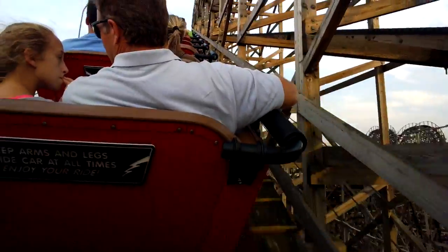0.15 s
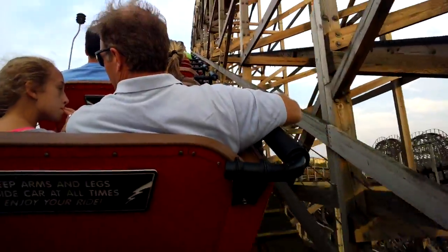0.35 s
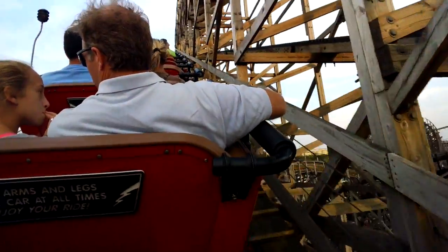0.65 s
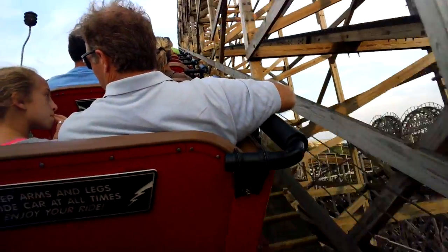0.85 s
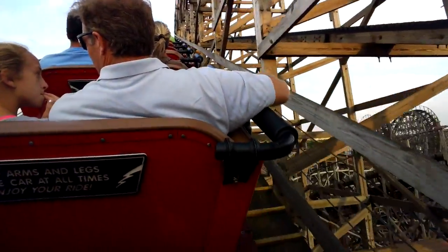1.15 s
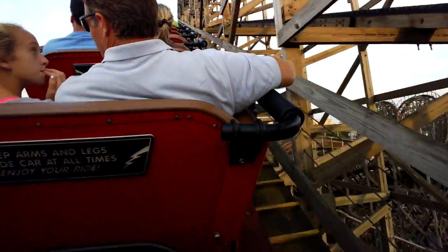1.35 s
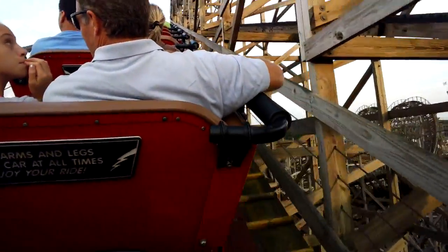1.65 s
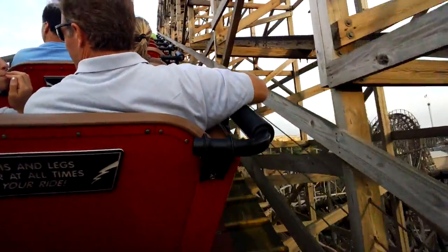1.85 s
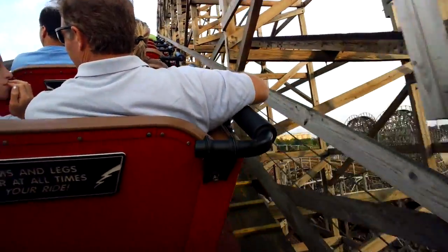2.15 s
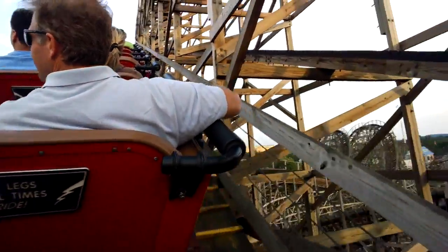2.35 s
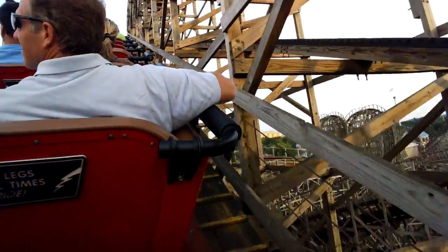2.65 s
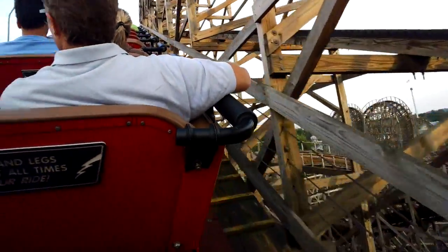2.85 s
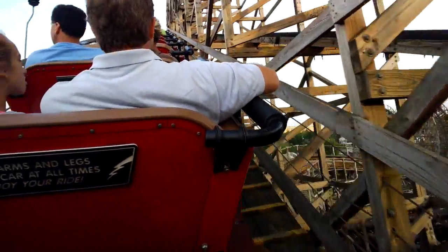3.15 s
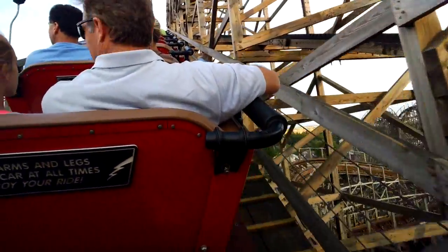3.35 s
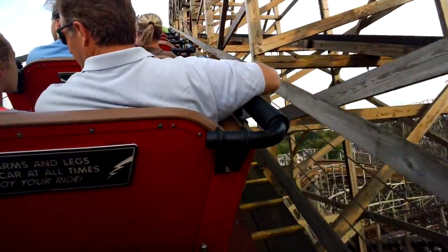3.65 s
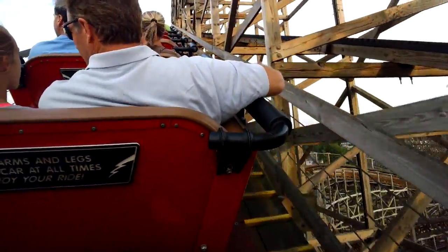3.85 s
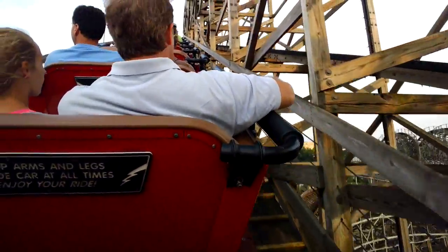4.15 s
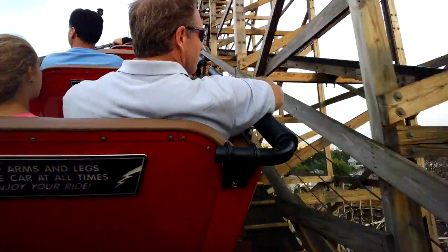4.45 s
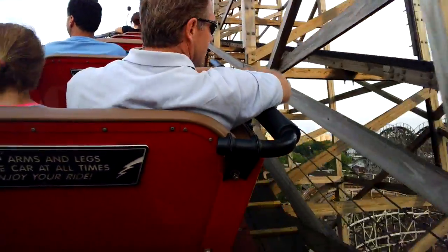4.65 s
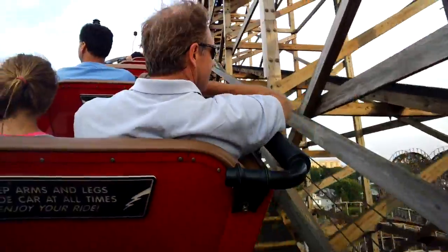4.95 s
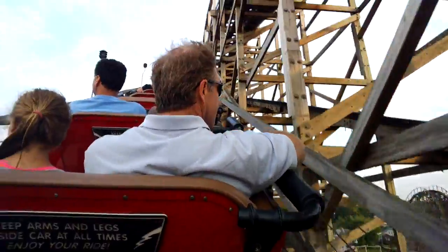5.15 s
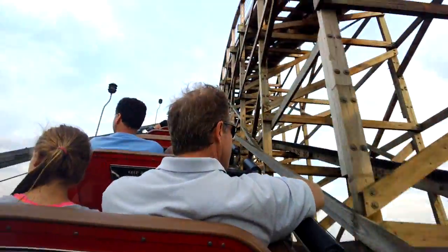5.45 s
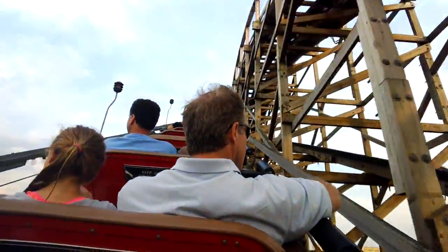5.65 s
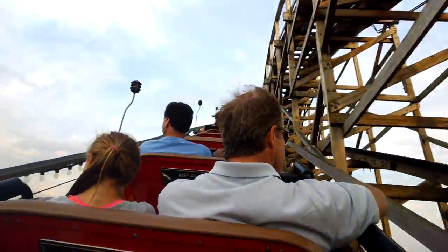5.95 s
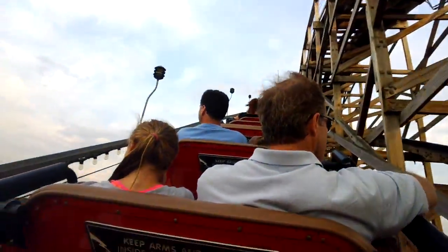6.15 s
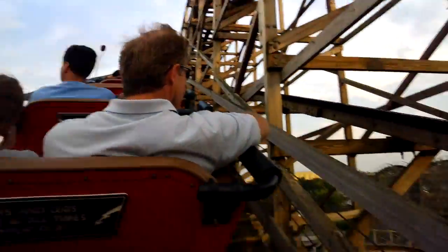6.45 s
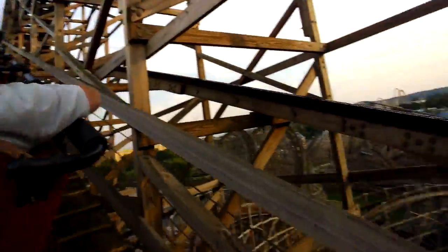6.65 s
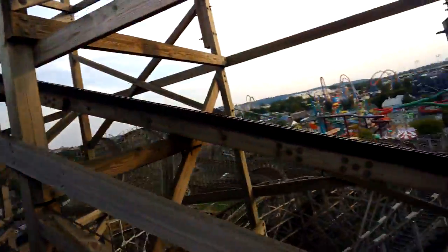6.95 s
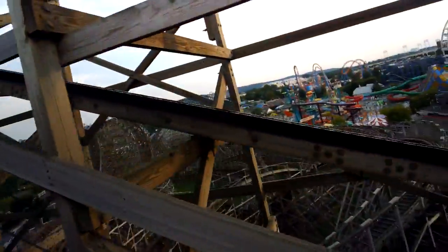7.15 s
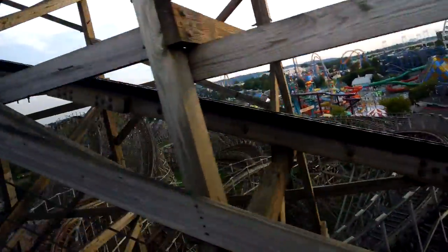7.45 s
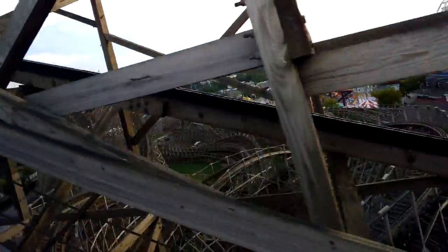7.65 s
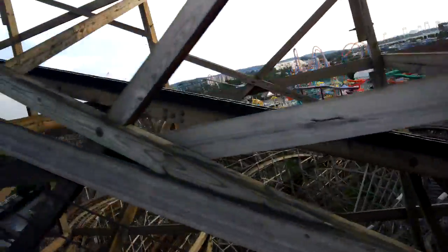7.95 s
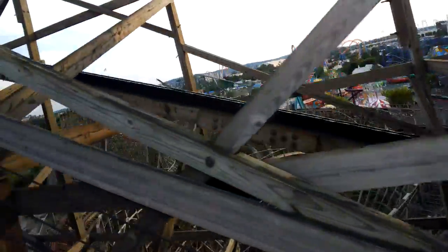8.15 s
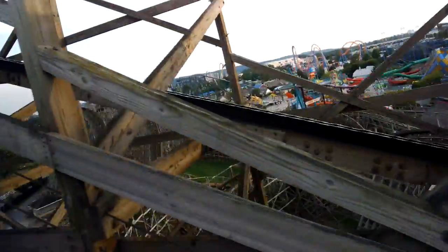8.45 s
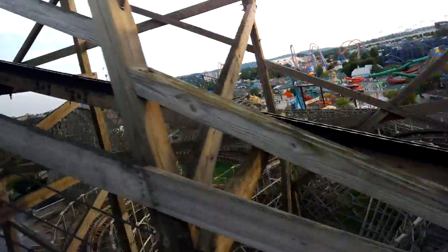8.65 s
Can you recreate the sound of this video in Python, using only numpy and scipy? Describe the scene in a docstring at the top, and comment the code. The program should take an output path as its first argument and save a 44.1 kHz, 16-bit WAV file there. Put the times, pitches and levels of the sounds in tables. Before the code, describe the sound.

A continuous fast metal ratchet rattles right under the microphone: dull clacks of the car body, sharp steel ticks and short high rings, about ten or more strikes a second in a loose mechanical rhythm. Occasional low timber thuds. Past the middle, wind begins softly, then buffets in low lumpy bursts and pops that briefly choke the rattle, which continues thinner to the end. Dry, narrow open-air sound from a handheld camera.

```python
"""Anti-rollback dogs of a wooden coaster train clack over the rack of its lift hill, heard from a camera in a car.
Each landing is a burst of noise through body colours and decaying modes: dull clacks, bright pings of steel.
Noise bursts ring the wheels and a plate; the chain is a random patter of small blows through the same steel.
Dull knocks of the timber are filtered noise, over a faint low noise with random level steps. Later, puffs of wind
thud on the microphone: swelling low noise, with decaying sines as pops. The picture is nearly mono."""
import sys
import numpy as np
from scipy import signal
from scipy.fft import rfft, irfft, next_fast_len
from scipy.io import wavfile
from scipy.ndimage import uniform_filter1d

SR = 44100
rng = np.random.default_rng(int(sys.argv[2]) if len(sys.argv) > 2 else 0)


def bounce(signal):
    """Save signal as a 16-bit WAV file at the path given by the first command-line argument."""
    frames = np.transpose(np.atleast_2d(signal))
    limited = np.clip(frames, -1, 1)
    pcm = np.round(limited * 32767).astype(np.int16)
    wavfile.write(sys.argv[1], SR, pcm)


N = 387638

# All levels are relative, ahead of the gains in the functions. Mode pitches are nominal; blows may detune them.
# blows on the nearest steel dog: hit_s [s], blow_db [dB], share of its high pair pair_db [dB]
NEAR_DOG_BLOWS = [(0.05, -25, -3), (0.1072, -21, -19), (0.208, -10, -7.5), (0.31, -9.5, -11),
                  (0.4104, -15.5, -17), (0.469, -15, -13), (0.5447, -21, -9), (0.5796, -20, -10),
                  (0.6826, -27, -14), (0.72, -16.5, -13), (0.7826, -19, -16), (0.884, -13, -27),
                  (0.9936, -25.5, 1), (1.045, -19, -9), (1.1238, -24, -8), (1.186, -20, -7),
                  (1.2755, -14, -11), (1.301, -15.5, -13), (1.42, -15, -15), (1.482, -30, -12),
                  (1.509, -11.5, -10), (1.613, -21, -4), (1.6821, -25, -23), (1.711, -17, -18),
                  (1.8731, -21, -27), (2.031, -13.5, -15), (2.0762, -30, -8), (2.136, -11, -14),
                  (2.234, -15, -19), (2.335, -13, -10), (2.4227, -17.5, -10), (2.451, -16.5, -12),
                  (2.552, -12, -19), (2.646, -14, -30), (2.6875, -19, -21), (2.7626, -18, -12.5),
                  (2.838, -18, -28), (2.8664, -20, -24), (2.928, -16, -10), (3.079, -19, -10),
                  (3.178, -15, -12.5), (3.2814, -17.5, -17), (3.324, -14, -13), (3.388, -22, -6),
                  (3.439, -17.5, -12), (3.4989, -32, -16), (3.5797, -15, -17), (3.6466, -23, -10),
                  (3.7007, -14, -14), (3.9, -12.5, -16), (3.989, -20, -7), (4.073, -19, -13),
                  (4.168, -14, -15), (4.2627, -26, -3), (4.3306, -24, -7.5), (4.3815, -21, -5),
                  (4.428, -14.5, -12), (4.5225, -11.5, -20), (4.6074, -22, -21), (4.6276, -13, -11),
                  (4.7284, -13, -18), (4.8564, -23, -7.5), (4.945, -24.5, -1), (5.0025, -22, -15),
                  (5.038, -12, -17), (5.2076, -15.5, -14), (5.309, -16.5, -8.5), (5.388, -28, -4),
                  (5.4115, -17, -14), (5.6306, -20, -9), (5.7194, -17, -12), (5.778, -20, -12),
                  (5.8227, -18, -15), (5.863, -15, -19), (5.993, -18, -14), (6.082, -16, -9),
                  (6.191, -17, -3), (6.295, -22, -1.5), (6.353, -23, -24), (6.445, -21, -15),
                  (6.599, -17, -23), (6.644, -19, -15), (6.7548, -32, -12), (6.988, -25.5, -11),
                  (7.059, -27, -15), (7.076, -21, -11), (7.3637, -27, -5), (7.4, -16.5, -21),
                  (7.565, -20, -17), (7.6321, -25, -11), (7.7537, -20, -9), (7.8575, -21.5, -11),
                  (7.955, -19, -19), (8.168, -18.5, -14), (8.267, -21, -18), (8.3727, -13.5, -12),
                  (8.442, -19.5, -28), (8.572, -26, -16), (8.689, -19, -16)]
# the car body as a broad colour: freq_hz [Hz], density_db [dB per Hz]
CAR_COLOUR = [(59, -63), (100, -59), (562, -4), (622, -1), (827, -2), (1980, 6), (2460, 3.5), (2670, -0.5),
              (3740, -4.5), (4140, -6), (5500, -5.5), (7150, -6.5), (12100, -120)]
# low modes of rack and wheels: pitch_hz [Hz], level_db [dB], t60_s [s]
RACK_LOW_MODES = [(1377, -0.5, 0.04), (1520, 1.5, 0.092), (1628, -4.5, 0.069), (1829, -7, 0.17),
                  (1970, -6.5, 0.11), (1947, 0, 0.087), (2198, 5.5, 0.014), (2480, -3, 0.027)]
# high modes of rack and wheels: pitch_hz [Hz], level_db [dB], t60_s [s]
RACK_HIGH_MODES = [(3200, 0, 0.0015), (4020, -15, 0.03), (4027, 3, 0.073), (4110, 1, 0.072),
                   (4250, 5.5, .03), (4348, 0.5, 0.031)]
# the dog's low modes: pitch_hz [Hz], level_db [dB], t60_s [s]
DOG_LOW_MODES = [(6213, 5, 0.021), (6380, -3.5, 0.034), (6530, -1, 0.014)]
# the dog's strong high pair: pitch_hz [Hz], level_db [dB], t60_s [s]
DOG_HIGH_PAIR = [(7945, 3, 0.04), (7915, -2, 0.03)]
# the dog's overtones: pitch_hz [Hz], level_db [dB], t60_s [s]
DOG_OVERTONES = [(10560, -3, .023), (11050, -1, .025), (12345, 0, .014), (13555, -1, .017)]
# broad treble of steel on steel: freq_hz [Hz], density_db [dB per Hz]
STEEL_COLOUR = [(2500, -11.5), (4500, -0.5), (5500, -8.5), (7200, -1.5), (8700, 3.5), (9600, -2),
                (11600, -2.5), (14500, -1)]
# hard gusts pressing on the port: dip_s [s], deep bass bass_db [dB], dip of the rattle dip_db [dB], half_s [s]
HARD_GUSTS = [(6.583, -50, 15, 0.019), (6.734, -44, 12.5, 0.019), (6.855, -42, 8.5, 0.04),
              (6.94, -55, 6, 0.041), (7.724, -58, 7.5, 0.02), (7.989, -49, 8, 0.013),
              (8.067, -50, 22, 0.033), (8.157, -59, 9, 0.034), (8.62, -65, 11.5, 0.023),
              (8.671, -56, 13.5, 0.019)]


def undb(db):
    """Amplitude factor of a level in dB."""
    return 10 ** (np.asarray(db) / 20)


def unit(x):
    """Scale to an RMS of 1."""
    return x / np.sqrt(np.mean(x ** 2))


def decay(t, t60):
    """Exponential amplitude decay that has fallen by 60 dB at t60."""
    return np.exp(-np.log(1000) * t / t60)


def colour(x, points):
    """Filter by a spectrum of (Hz, dB) points, joined by straight lines over log frequency."""
    hz, db = np.transpose(points)
    size = next_fast_len(N)
    f = np.arange(size // 2 + 1) * SR / size + 1  # 1 Hz up, to keep the log finite
    gain = undb(np.interp(np.log(f), np.log(hz), db))
    return irfft(rfft(x, size) * gain, size)[:N]


def ring(x, modes, times=(), vary_db=0., detune=0.):
    """Sum of decaying resonances driven by x; each blow lands on another part, so it weighs and tunes them anew."""
    blow = np.searchsorted(times, np.arange(len(x)) / SR)
    chance = rng.standard_normal((len(times) + 1, 2, len(modes)))
    weights = undb(vary_db * np.clip(chance[:, 0], -3, 1.3))
    weights = 1.25 * weights / np.sqrt(np.mean(weights ** 2, axis=1, keepdims=True))
    tuning = 1 + detune * chance[:, 1]
    out, push = 0, signal.lfilter([1, 0, -1], [1], x)
    for k, (hz, db, t60) in enumerate(modes):
        r, w = decay(1 / SR, t60), 2 * np.pi * hz / SR
        turn = np.exp(1j * np.cumsum(w * tuning[blow, k]))
        # shift the mode down to 0 Hz, let it decay there, shift it back
        swing = signal.lfilter([1], [1, -r], push * weights[blow, k] / turn)
        out = out + undb(db) * np.sqrt(1 - r) / np.sin(w) * (turn * swing).imag
    return out


def bursts(times, db, rise_s, t60):
    """Envelope of blows that swell softly from rise_s ahead of each time and die away; powers add."""
    power = np.zeros(N)
    for s, gain, up, down in np.broadcast(times, undb(db), rise_s, t60):
        i = max(int((s - up) * SR), 0)
        up, down = max(up, 1e-4), max(down, 5e-3)
        t = np.arange(min(int(down * SR), N - i)) / SR
        swell = 1 - np.exp(-(t / up) ** 2)
        power[i:i + len(t)] += (gain * swell * decay(t, down)) ** 2
    return np.sqrt(power)


def chatter(hold_s, spread_db):
    """Noise whose size jumps every hold_s: many tiny bounces of uneven force, none far above the rest."""
    k = max(int(hold_s * SR), 1)
    force = np.minimum(rng.standard_normal(N // k + 1), 1)
    size = np.repeat(undb(spread_db * force), k)[:N]
    return unit(rng.standard_normal(N) * size)


def voice(envelope, drive, modes, times, vary_db=8.5, detune=0.0047):
    """Ring the modes under an envelope, scaled by how loudly the steady drive would ring them."""
    steady = ring(drive[:2 * SR], modes)
    return ring(envelope * drive, modes, times, vary_db, detune) / np.sqrt(np.mean(steady ** 2))


def car_and_rack():
    """All the rattle of the car together; the rattle loses its deep bass, only the knocks keep theirs."""
    rattle = lulls() * (clacks() + pings() + chain()) + rings()
    # a narrow dip near 2.7 kHz, perhaps from the microphone casing
    dip_hz, dip_width_hz, dip_share = 2667, 126, 0.61
    narrow_band = signal.lfilter(*signal.iirpeak(dip_hz, dip_hz / dip_width_hz, fs=SR), rattle)
    rattle = rattle - dip_share * narrow_band + plate()
    no_bass = signal.butter(4, 230., "high", fs=SR, output="sos")
    return signal.sosfilt(no_bass, rattle) + knocks()


def clacks():
    """Each landing is a short bouncing contact that shakes car and rack and scrapes out treble, in its own mix."""
    # dogs landing on the rack: hit_s [s], blow_db [dB], t60_s of the blow, shortened for some layers [s]
    landings = [(0.045, -19, 0.51), (0.1121, -24, 0.19), (0.2005, -15.5, 0.5), (0.3127, -10, 0.1),
                (0.341, -11.5, 0.093), (0.415, -31, 0.096), (0.4476, -14, 0.26), (0.492, -16, 0.52),
                (0.553, -13.5, 0.26), (0.584, -13, 0.65), (0.6594, -6, 0.064), (0.6905, -9.5, 0.099),
                (0.7215, -4, 0.062), (0.7916, -18, 0.082), (0.8754, -19, 0.98), (0.9414, -18, 0.14),
                (0.965, -13.5, 0.21), (0.9904, -15, 0.1), (1.037, -11, 0.14), (1.0764, -11, 0.076),
                (1.1215, -16, 0.15), (1.1448, -21.5, 0.25), (1.173, -12, 0.18), (1.192, -14, 0.06),
                (1.2285, -3, 0.051), (1.275, -3.5, 0.1), (1.3344, -18, 0.18), (1.377, -13, 0.14),
                (1.48, -15.5, 0.38), (1.537, 3, 0.042), (1.5788, -14, 0.062), (1.639, -6, 0.099),
                (1.6825, -17, 0.38), (1.7415, -14.5, 0.15), (1.786, -15.5, 0.3), (1.835, -8.5, 0.091),
                (1.8684, -14, 0.13), (1.899, -12, 0.088), (1.9856, -17, 0.14), (2.0144, -13, 0.1),
                (2.078, -16.5, 0.13), (2.137, -20, 0.16), (2.1794, -27, 0.12), (2.2318, -22, 0.077),
                (2.274, -22, 0.38), (2.318, -12, 0.17), (2.344, -13, 0.13), (2.368, -11, 0.13),
                (2.4194, -13, 0.1), (2.4468, -14, 0.11), (2.4735, -13, 0.16), (2.54, -23, 0.095),
                (2.5545, -13, 0.075), (2.5882, -6.5, 0.062), (2.632, -21, 0.13), (2.6509, -9, 0.1),
                (2.6818, -13.5, 0.097), (2.7616, -12, 0.056), (2.7916, -13, 0.11), (2.812, -8, 0.078),
                (2.837, -11.5, 0.1), (2.8674, -16, 0.14), (2.9013, -16.5, 0.18), (2.9292, -18, 0.29),
                (2.966, -11, 0.09), (2.9941, -17, 0.1), (3.012, -16, 0.14), (3.07, -14.5, 0.28),
                (3.114, -9, 0.08), (3.1354, -13, 0.083), (3.171, -21.5, 0.12), (3.319, -13.5, 0.19),
                (3.394, -16.5, 0.37), (3.4605, -10, 0.059), (3.492, -18, 0.13), (3.521, -19.5, 0.22),
                (3.578, -22, 0.56), (3.6471, -18, 0.05), (3.723, -15, 0.11), (3.786, -19.5, 0.71),
                (3.893, -20, 0.25), (3.942, -12.5, 0.093), (3.9874, -12.5, 0.08), (4.0387, -12, 0.11),
                (4.093, -7, 0.075), (4.1709, -18, 0.13), (4.1885, -10.5, 0.15), (4.2593, -11.5, 0.11),
                (4.283, -14.5, 0.15), (4.356, -17, 0.39), (4.393, -11, 0.34), (4.551, -15, 0.3),
                (4.6069, -17, 0.33), (4.655, -10, 0.081), (4.7132, -21, 0.4), (4.7656, -20, 0.09),
                (4.8833, -21, 0.11), (4.949, -12.5, 0.096), (4.9777, -9, 0.11), (5.0325, -14, 0.1),
                (5.0704, -16.5, 0.12), (5.204, -17.5, 0.18), (5.227, -10.5, 0.12), (5.291, -22, 0.35),
                (5.327, -6, 0.13), (5.3872, -12, 0.063), (5.4123, -17, 0.18), (5.569, -15, 0.13),
                (5.6027, -15.5, 0.18), (5.629, -13, 0.29), (5.716, -18, 0.39), (5.755, -11, 0.11),
                (5.8187, -16, 0.21), (5.856, -21.5, 1), (5.919, -10, 0.18), (5.9938, -20, 0.11),
                (6.0247, -11.5, 0.15), (6.0831, -16.5, 0.083), (6.118, -14, 0.14), (6.2225, -18, 0.25),
                (6.294, -12, 0.086), (6.328, -20.5, 0.26), (6.385, -7, 0.064), (6.4472, -21.5, 0.22),
                (6.482, -15.5, 0.14), (6.511, -13, 0.056), (6.64, -14, 0.14), (6.695, -21, 0.16),
                (6.9885, -29, 0.11), (7.077, -21.5, 0.4), (7.1242, -19, 0.066), (7.2125, -24, 0.11),
                (7.2355, -22, 0.093), (7.281, -29, 0.2), (7.31, -14.5, 0.099), (7.3707, -16, 0.22),
                (7.489, -13.5, 0.044), (7.5724, -16, 0.088), (7.6331, -32, 0.094), (7.7414, -26, 0.3),
                (7.7942, -16, 0.091), (7.855, -18.5, 0.13), (7.883, -17.5, 0.29), (8.245, -22, 0.44),
                (8.315, -17.5, 0.36), (8.368, -7, 0.049), (8.403, -10.5, 0.09), (8.4457, -15, 0.064),
                (8.566, -15, 0.098), (8.6916, -32, 0.11), (8.73, -15, 0.089)]
    s, db, t60 = np.transpose(landings)
    drive = chatter(0.0025, 2.5)
    blow = bursts(s, db, 0.0079, t60)
    high_blow = bursts(s, db, 0.0053, 0.83 * t60)
    scrape_db = 2.5 * rng.standard_normal(len(s))
    scrape = bursts(s, db + scrape_db, 0.0062, 0.75 * t60)
    car = undb(-11.0) * blow * unit(colour(drive, CAR_COLOUR))
    rack_low = undb(-18.0) * voice(blow, drive, RACK_LOW_MODES, s, detune=0.031)
    rack_high = undb(-15.5) * voice(high_blow, drive, RACK_HIGH_MODES, s, detune=0.0187)
    steel = undb(-12.0) * scrape * unit(colour(drive, STEEL_COLOUR))
    return car + rack_low + rack_high + steel


def pings():
    """A sharp contact rings the near dog's modes and scrapes out broad treble."""
    s, db, pair_db = np.transpose(NEAR_DOG_BLOWS)
    drive = chatter(0.0037, 0.42)
    low = voice(bursts(s, db, 0.00054, 0.063), drive, DOG_LOW_MODES, s)
    pair_blow = bursts(s, db + pair_db, 0.0045, 0.062)
    pair = voice(pair_blow, drive, DOG_HIGH_PAIR, s, vary_db=-3.0, detune=0.0012)
    overtones = voice(bursts(s, db, 0.0021, 0.099), drive, DOG_OVERTONES, s, detune=0.0028)
    scrape = bursts(s, db, 0.00071, 0.085) * unit(colour(drive, STEEL_COLOUR))
    return undb(-10.0) * low + undb(5.5) * pair + undb(-17.0) * overtones + undb(-9.5) * scrape


def rings():
    """A short bouncing contact drives three close modes of a wheel."""
    # wheels ringing out, each at its own pitch: start_s [s], peak_db [dB], middle mode pitch_hz [Hz]
    wheel_rings = [(0.0483, -16, 4160), (0.1997, -15.5, 4020), (0.417, -24, 4030), (0.6913, -29, 4240),
                   (0.728, -21, 4100), (0.9434, -20, 4000), (1.045, -32, 4270), (1.1246, -24, 4300),
                   (1.175, -18.5, 3960), (1.272, -20, 3910), (1.481, -27, 4150), (1.837, -26, 4450),
                   (1.9862, -17, 4094), (2.086, -23, 4310), (2.139, -26, 4030), (2.23, -29, 4100),
                   (2.319, -28, 4020), (2.4727, -23, 4000), (2.541, -25, 4050), (2.588, -24, 4170),
                   (2.812, -20, 4300), (2.9286, -16, 4070), (2.994, -29, 4000), (3.072, -25, 4280),
                   (3.492, -19, 4240), (3.5788, -15, 4140), (3.6463, -20, 4180), (3.7904, -25, 4110),
                   (3.896, -18.5, 4070), (3.9882, -22, 4270), (4.0938, -13, 4130), (4.1884, -13, 4270),
                   (4.2648, -15, 4090), (4.39, -21, 4170), (4.8846, -21.5, 4220), (5.2046, -25, 4200),
                   (5.387, -25, 4360), (5.5756, -25, 3980), (5.6027, -27, 4300), (5.713, -19, 4200),
                   (5.9943, -23, 4220), (6.0317, -20, 4270), (6.1155, -25, 3930), (6.235, -21, 4200),
                   (6.294, -26, 4030), (6.7714, -25.5, 4300), (7.367, -19.5, 4270), (7.4905, -25, 4030),
                   (7.6315, -26, 4150), (7.7553, -26, 4060), (7.855, -22, 4170)]
    gain_db, contact_t60_s, ring_t60_s, pair_hz = 0.5, 0.037, 0.048, 91
    out, t = np.zeros(N), np.arange(int(.15 * SR)) / SR
    for s, db, hz in wheel_rings:
        contact = rng.standard_normal(len(t)) * decay(t, contact_t60_s)
        middle = np.sin(2 * np.pi * hz * t)
        upper = 0.53 * np.sin(2 * np.pi * (hz + pair_hz) * t)
        lower = .45 * np.sin(2 * np.pi * (hz - 1.96 * pair_hz) * t)
        note = signal.fftconvolve(contact, decay(t, ring_t60_s) * (middle + upper + lower))[:len(t)]
        i = int(s * SR)
        out[i:i + len(t)] += (undb(db + gain_db) * note / np.abs(note).max())[:N - i]
    return out


def plate():
    """Some blows ring a lone plate through two close modes."""
    # blows that catch the plate: hit_s [s], blow_db [dB]
    plate_blows = [(0.4923, -30), (0.8699, -33), (1.7419, -34), (1.8123, -34), (1.9006, -33), (2.4758, -30),
                   (2.5366, -33), (2.6314, -38), (2.6863, -34), (2.8365, -30), (2.8963, -29), (3.0086, -36),
                   (3.4077, -28), (3.4595, -32), (3.6132, -36), (3.7204, -29), (4.1914, -32), (4.3545, -37),
                   (4.7157, -38), (5.0695, -34), (5.7189, -34), (5.8561, -33), (6.1135, -37), (6.1963, -37),
                   (6.3884, -37), (6.4792, -33)]
    # the plate's modes: pitch_hz [Hz], level_db [dB], t60_s [s]
    plate_modes = [(2842, 12, 0.085), (2880, 0, 0.06)]
    s, db = np.transpose(plate_blows)
    blow = bursts(s, db, 0.003, .035)
    drive = rng.standard_normal(N)
    return undb(10.0) * voice(blow, drive, plate_modes, s, vary_db=-1.0, detune=0.0022)


def chain():
    """Links and far dogs: a dense random patter of small blows over a blur of car, steel and timber."""
    # chain under the car: time_s [s], level_db [dB], treble_db [dB], timber rumble timber_db [dB]
    chain_levels = [(0, -32, -6, -16.5), (3.87, -32.5, -4, -14), (5.4, -36.5, -5, -13.5),
                    (6.05, -38, -8, -3.5), (6.9, -37.5, -11.5, -5.5), (7.17, -37, -6, -7.5),
                    (7.93, -36, -12, -10.5), (8.3, -35, -10, -7), (8.79, -36.5, -5, -6)]
    s, *columns = np.transpose(chain_levels)
    db, treble_db, timber_db = (np.interp(np.arange(N) / SR, s, c) for c in columns)
    chance = rng.random((800, 2))  # time and force of each small blow
    times = np.sort(chance[:, 0]) * N / SR
    small_blows = unit(bursts(times, 6. * chance[:, 1], .001, .045))
    patter = np.hypot(.55, small_blows)  # over a steady floor
    drive = rng.standard_normal(N)
    body = (patter * unit(colour(drive, CAR_COLOUR))
            + 0.44 * voice(patter, drive, RACK_LOW_MODES, times, detune=0.017)
            + 0.62 * voice(patter, drive, RACK_HIGH_MODES, times, detune=0.011))
    steel = (patter * unit(colour(drive, STEEL_COLOUR))
             + 0.88 * voice(patter, drive, DOG_LOW_MODES + DOG_HIGH_PAIR, times, detune=0.0027)
             + 0.44 * voice(patter, drive, DOG_OVERTONES, times, detune=0.0027))
    timber_colour = [(80, -21), (250, -6.5), (450, 3.0), (1300, 4.5), (4000, -28)]  # Hz, dB per Hz
    timber = unit(colour(chatter(.045, 4.5), timber_colour))
    return undb(db) * (unit(body) + undb(treble_db) * unit(steel) + undb(timber_db) * timber)


def lulls():
    """Gain that dips smoothly at each lull, in each gust and, as the near dog drops, just before each ping."""
    # the rattle drops away briefly: dip_s [s], dip_db [dB], half_s [s]
    brief_lulls = [(.013, 2, 0.017), (.301, 9.5, 0.011), (.773, 6, 0.008), (1.408, 3.5, 0.03),
                   (2.164, 7, 0.015), (3.678, 4, 0.026), (4.068, 10, 0.023), (5.686, 12, 0.0071),
                   (5.971, 9, 0.017), (6.178, 5, 0.021), (6.279, 6.5, 0.011), (6.53, 12, 0.012),
                   (6.638, 8, 0.03), (7.436, 6.5, 0.018)]
    hush_db, hush_lead_s, hush_half_s = 1.5, 0.015, 0.012
    gust_dips = [(s, db, half) for s, _, db, half in HARD_GUSTS]
    hushes = [(s - hush_lead_s, hush_db, hush_half_s) for s, *_ in NEAR_DOG_BLOWS]
    t = np.arange(0, N + 64, 64) / SR  # coarse time grid
    db = sum(depth * np.exp(-((t - s) / half) ** 2) for s, depth, half in brief_lulls + gust_dips + hushes)
    return undb(-np.interp(np.arange(N) / SR, t, db))


def knocks():
    """Short low thumps from the timber frame, over a faint low noise with random level steps."""
    # dull knocks through the frame: hit_s [s], level_db [dB]
    frame_knocks = [(0.067, -47), (0.251, -52), (0.356, -56), (0.972, -53), (1.228, -45), (2.259, -51),
                    (4.343, -42), (4.77, -47), (4.978, -48), (5.219, -50), (5.367, -43), (5.622, -46)]
    # colour of a knock: freq_hz [Hz], density_db [dB per Hz]
    knock_colour = [(30, -40), (110, -19), (270, -2), (450, -3), (900, -50)]
    s, db = np.transpose(frame_knocks)
    noise = rng.standard_normal(N)
    blows = bursts(s, db, 0.0029, 0.28) * noise
    thumps = colour(blows, knock_colour) / np.std(colour(noise, knock_colour))
    low_noise = unit(colour(chatter(.11, 14.), knock_colour))
    return thumps + undb(-67.) * low_noise


def wind():
    """Low lumpy turbulence on the microphone: a thud for each puff, a deep bump for each gust."""
    # puffs of wind: time_s [s], level_db [dB], t60_s [s]
    wind_puffs = [(5.257, -36.5, 0.19), (5.669, -30, 0.25), (6.116, -33, 0.52), (6.492, -23, 0.17),
                  (6.709, -30, 0.075), (6.738, -31, 0.17), (6.823, -28.5, 0.082), (6.843, -32, 0.11),
                  (7.095, -35, 0.18), (7.135, -27.5, 0.33), (7.295, -27.5, 0.37), (7.652, -29, 0.31),
                  (7.767, -31.5, 0.49), (7.985, -29.5, 0.27), (8.04, -32.5, 0.26), (8.248, -27.5, 0.13),
                  (8.323, -29.5, 0.15), (8.408, -27.5, 0.17), (8.555, -30, 0.22)]
    # wind on the microphone port: freq_hz [Hz], density_db [dB per Hz]
    wind_colour = [(60, -22), (150, -10), (330, -1.5), (700, 2.5), (1800, -4), (4000, -61)]
    # its deep bass: freq_hz [Hz], density_db [dB per Hz]
    deep_colour = [(20, -3), (60, -2), (110, 0), (220, -9), (500, -64)]
    s, db, t60 = np.transpose(wind_puffs)
    gust_s, bass_db = np.transpose(HARD_GUSTS)[:2]
    gust_lead_s, gust_t60_s = 0.024, 0.27  # the bump starts ahead of the dip in the rattle
    lumps = chatter(0.0044, 5.0)
    puff = bursts(s, db, 0.13 * t60, t60)  # longer puffs swell more slowly
    thud = colour(puff * unit(colour(lumps, wind_colour)), [(40, -36), (130, 6.5), (20000, 1.5)])
    puff_bass = bursts(s, db - 30, 0.013, gust_t60_s)
    gust_bass = bursts(gust_s - gust_lead_s, bass_db, 0.0064, gust_t60_s)
    deep = np.hypot(puff_bass, gust_bass)
    return thud + pops() + deep * unit(colour(lumps, deep_colour))


def pops():
    """A push of air on the membrane swings a few times and stops: a fast-decaying sine."""
    # single pressure pops among the sharp early puffs: start_s [s], level_db [dB]
    air_pops = [(6.512, -32), (6.711, -37), (6.742, -27), (6.832, -23), (6.846, -23.5)]
    pitches_hz = 435 * (1 + 0.18 * rng.standard_normal(len(air_pops)))
    out, t = np.zeros(N), np.arange(int(.03 * SR)) / SR
    for (s, db), hz in zip(air_pops, pitches_hz):
        i = int(s * SR)
        out[i:i + len(t)] += undb(db + 4.0) * decay(t, 0.013) * np.sin(2 * np.pi * hz * t)
    return out


def scene():
    """Nearly mono: a faint side signal, smeared in phase, that comes and goes in patches."""
    # how far the channels differ: freq_hz [Hz], side against mid side_db [dB]
    side_colour = [(60, -25), (200, -25), (500, -30), (1260, -33), (4270, -31), (7850, -24), (14400, -17)]
    mid = car_and_rack() + wind()
    smear = irfft(np.exp(2j * np.pi * rng.random(257)))  # random phases, equal strengths
    patch_db = 20.0 * np.minimum(rng.standard_normal(N // 2048 + 1), 1)
    patches = uniform_filter1d(np.repeat(undb(patch_db), 2048)[:N], size=1024)
    side = unit(patches) * colour(signal.fftconvolve(mid, smear)[:N], side_colour)
    return np.array([mid + side, mid - side])


def record(dry):
    """The camera thins the deep bass, holds down loud blows with a quick limiter and cuts the top."""
    thin = signal.sosfilt(signal.butter(2, 40., "high", fs=SR, output="sos"), dry)
    loudness = np.sqrt(uniform_filter1d(np.mean(thin ** 2, axis=0), size=130) + 1e-12)  # over about 3 ms
    held = thin / np.maximum(loudness / undb(-23.), 1) ** .6
    top_cut = signal.ellip(10, .3, 60, 13980, fs=SR, output="sos")
    return signal.sosfilt(top_cut, held)


dry = scene()
out = record(dry)
bounce(out)
```